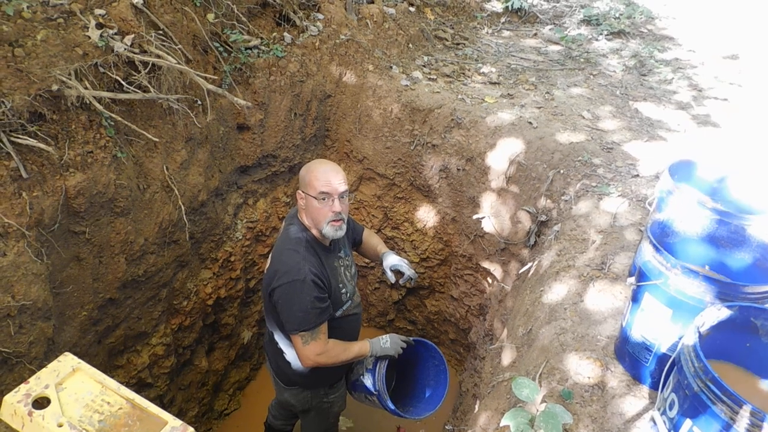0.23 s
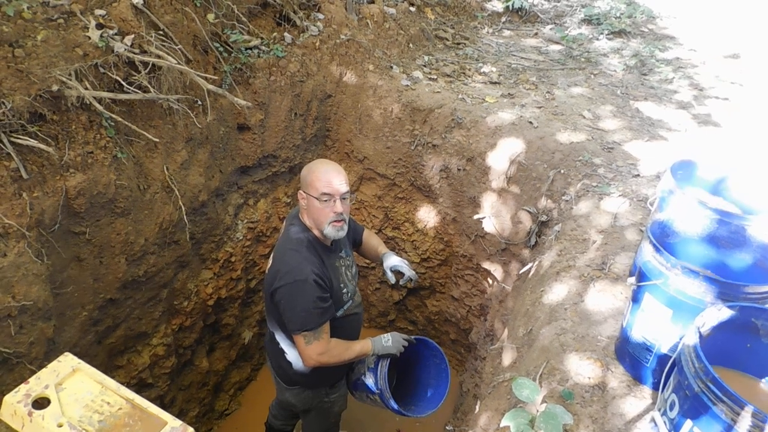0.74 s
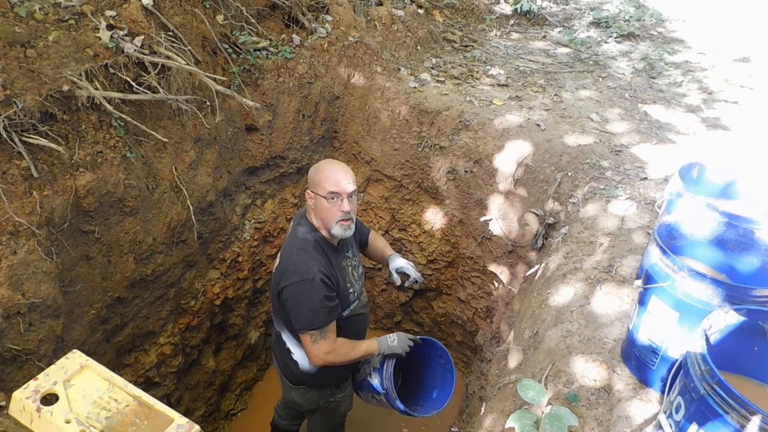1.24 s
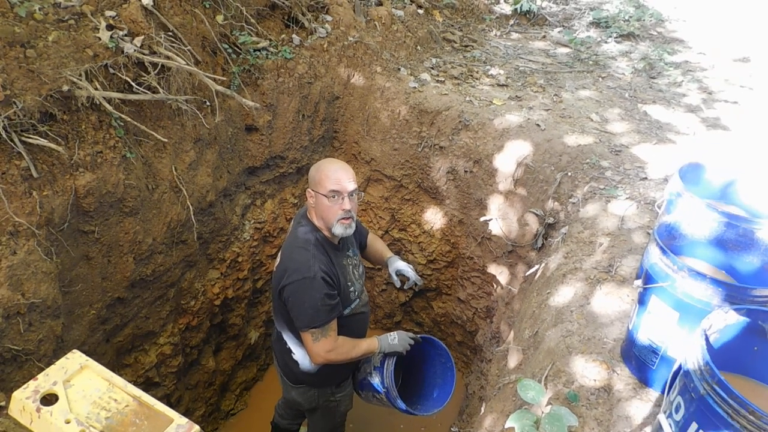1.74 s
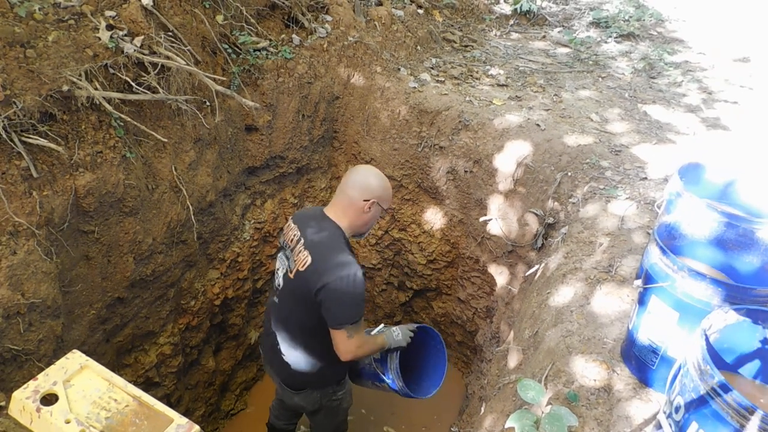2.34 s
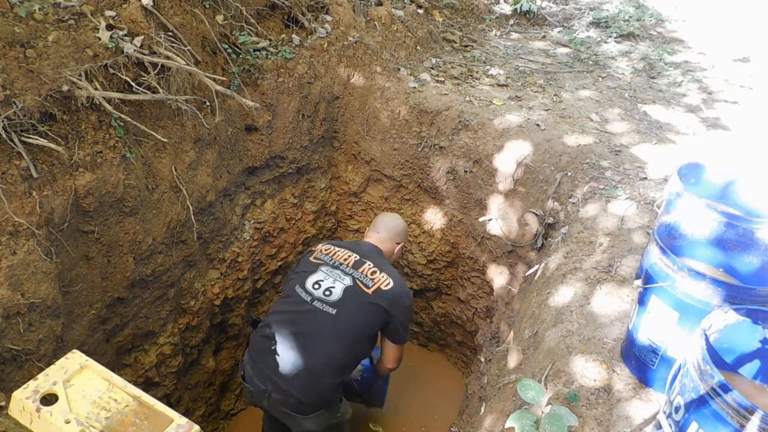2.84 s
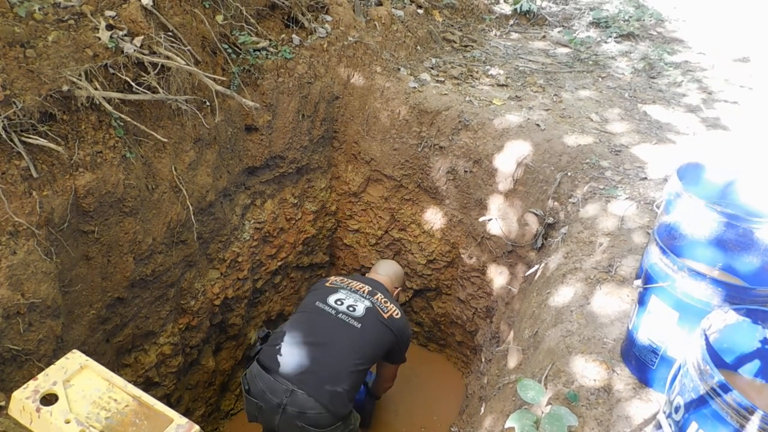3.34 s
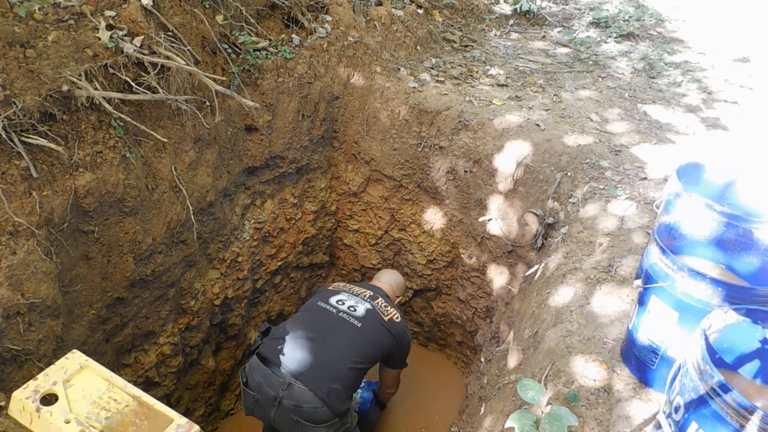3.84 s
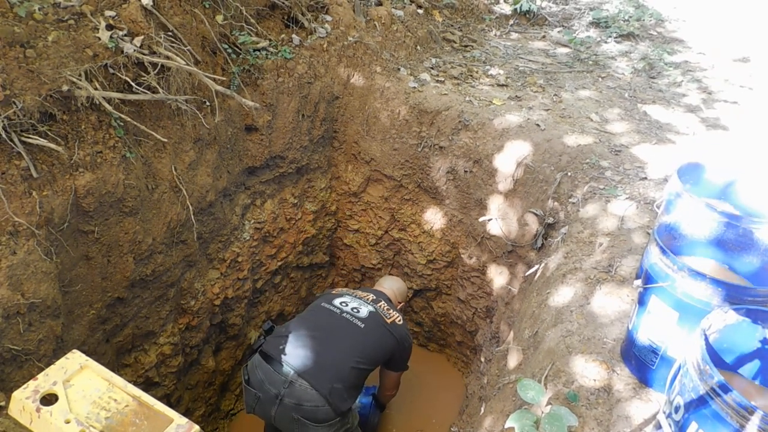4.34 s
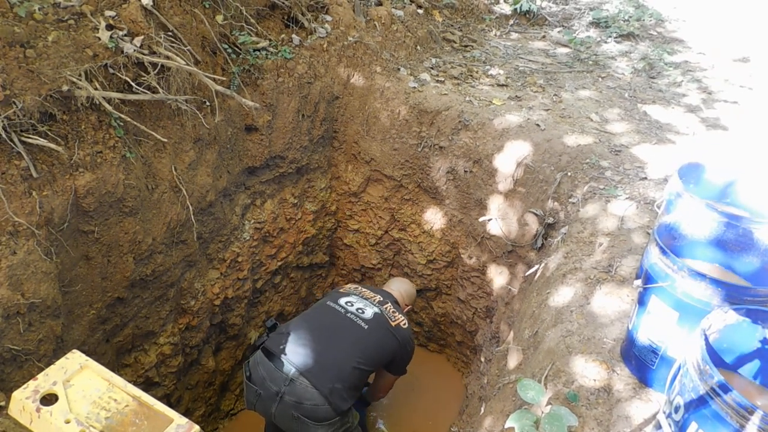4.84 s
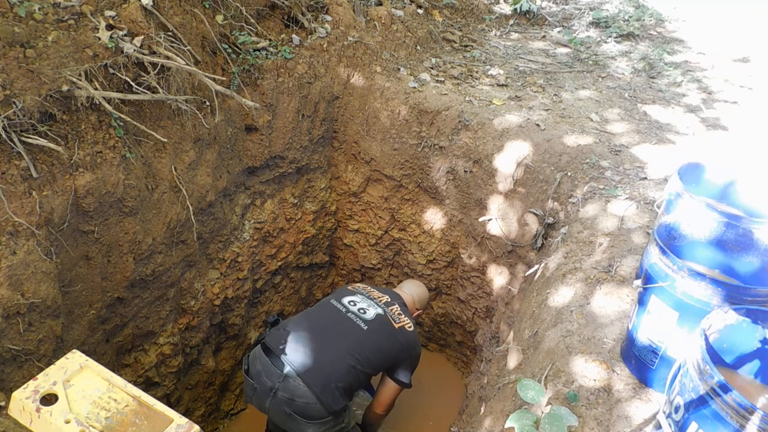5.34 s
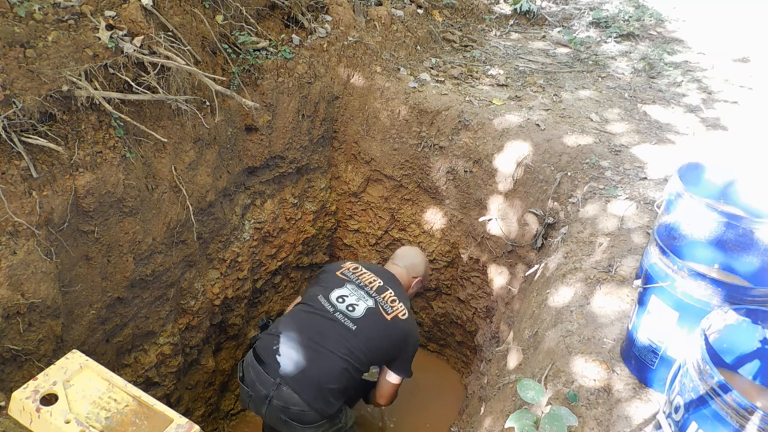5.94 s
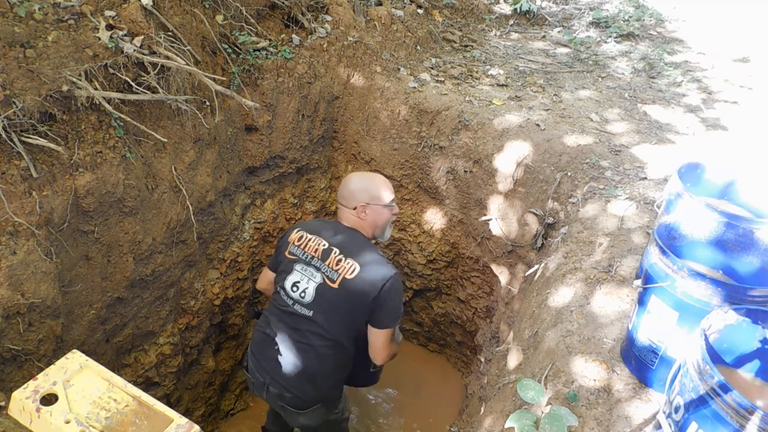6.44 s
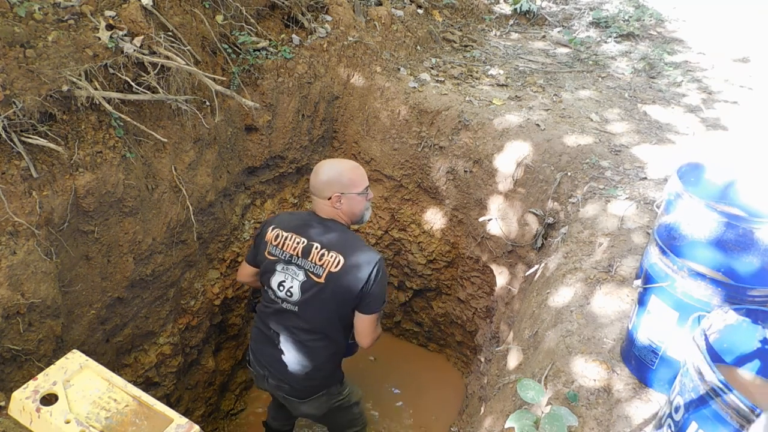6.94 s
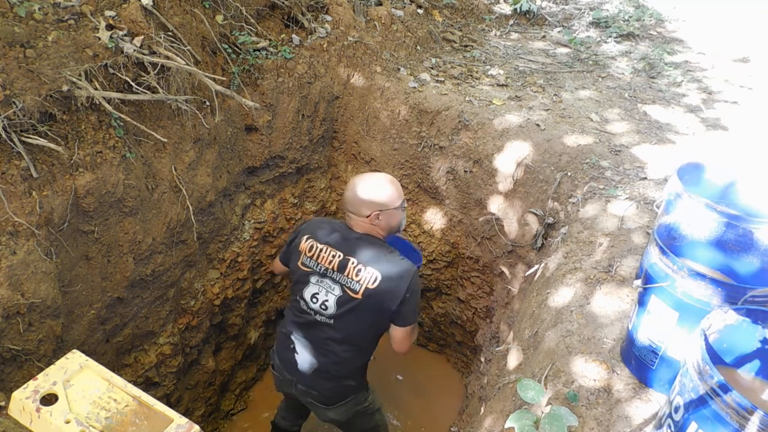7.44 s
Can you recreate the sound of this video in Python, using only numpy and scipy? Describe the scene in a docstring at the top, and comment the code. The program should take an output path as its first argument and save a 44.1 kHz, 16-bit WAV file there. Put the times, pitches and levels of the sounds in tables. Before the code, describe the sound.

Insects shrill softly outdoors; light knocks and boot shuffles, then a plastic bucket slaps muddy water, gulps, sloshes, and lifts out dripping.

```python
"""At the bottom of an earth pit in summer woodland, a plastic bucket is dipped into muddy water.
After light knocks close by and some shuffling, it slaps the surface, gulps, is hauled out in a rush
of water, then drips and bumps as it is lifted. Insects shrill in the trees throughout.
Water is built from rising bubbles and grainy noise, the bucket and knocks from ringing modes,
boots and insects from shaped noise; echoes from the clay walls surround what happens in the pit."""
import sys
import numpy as np
from scipy import signal
from scipy.fft import rfft, irfft, next_fast_len
from scipy.io import wavfile
from scipy.ndimage import uniform_filter1d

SR = 44100
rng = np.random.default_rng(int(sys.argv[2]) if len(sys.argv) > 2 else 0)


def put_to_file(sound):
    """Save the sound as 16-bit audio at rate SR, in the file named by the first command-line argument."""
    columns = np.atleast_2d(sound).T  # one column per channel
    safe = np.clip(columns, -1, 1)
    whole_steps = np.round(safe * 32767)
    wavfile.write(sys.argv[1], SR, whole_steps.astype(np.int16))


N = 339570
T = np.arange(N) / SR


def from_db(db):
    """Turn decibels into a gain."""
    return 10 ** (np.asarray(db) / 20)


def rms_one(x):
    """Scale a sound to an average (rms) level of 1."""
    return x / np.sqrt(np.mean(x ** 2) + 1e-20)


def at_hz(points, hz):
    """Read a table between its points, along a logarithmic pitch axis."""
    point_hz, value = np.transpose(points)
    return np.interp(np.log(np.maximum(hz, 1)), np.log(point_hz), value)


def band(x, low_hz, high_hz):
    """Keep only the sound between two pitches."""
    edges_hz = [low_hz, min(high_hz, SR / 2 - 1000)]
    return signal.sosfilt(signal.butter(2, edges_hz, "band", fs=SR, output="sos"), x + 1e-18)


# How alike left and right are, for near sounds and for far ones: [pitch_hz, likeness_0_to_1]
NEAR_LIKENESS = [(60, 0.8), (300, 1), (700, 0.95), (1400, 0.82), (3000, 0.53), (6800, 0.1), (15000, 0)]
FAR_LIKENESS = [(60, 0.77), (300, 0.23), (1400, 0.32), (3000, 0), (7000, 0.11), (15000, 0)]


def noise(colour, likeness, size=N):
    """Stereo noise with a given spectrum and left-right likeness, at rms 1."""
    n = next_fast_len(size)
    hz = np.arange(n // 2 + 1) * SR / n
    mid, side = rfft(rng.standard_normal((2, n)))
    alike = np.clip(at_hz(likeness, hz), -1, 1)
    pair = np.sqrt(1 + alike) * mid + np.sqrt(1 - alike) * side * [[1], [-1]]
    return rms_one(irfft(pair * from_db(at_hz(colour, hz)), n)[:, :size])


def flutter(per_s):
    """A smooth random wander with rms 1, given a new target per_s times a second."""
    knots = rng.standard_normal(4000)
    return rms_one(np.interp(T * per_s, np.arange(len(knots)), knots))


def add(out, s, sound):
    """Mix a sound in at time s."""
    i = max(int(s * SR), 0)
    room = out[..., i:i + sound.shape[-1]]
    room += sound[..., :room.shape[-1]]


def bursts(rows):
    """Sum sudden, dying envelopes from rows of (start_s, level_db, decay_s)."""
    out = np.zeros(N)
    for s, db, decay in rows:
        add(out, s, from_db(db) * np.exp(-T[:SR // 5] / max(decay, .0005)))
    return out


def swells(rows, swell_share, end_s):
    """Envelopes that swell, hold and die away, from rows of (start_s, length_s, level_db)."""
    power, t = np.zeros(N), T[:SR]
    for s, length, db in rows:
        attack = np.minimum(t / (swell_share * length), 1)
        release = np.exp(-np.maximum(t - length, 0) / end_s)
        add(power, s, (from_db(db) * attack * release) ** 2)
    return np.sqrt(power)


def patter(per_s, spread_db, decay_s, mist):
    """Level of spray: many droplets, each a sudden tick, over an even mist."""
    size_db = abs(spread_db) * np.minimum(rng.exponential(1, N), 3)
    hits = (rng.random(N) < per_s / SR) * from_db(size_db)
    ticks = signal.lfilter([1], [1, -np.exp(-1 / (decay_s * SR))], hits + 1e-18)
    return rms_one(mist + rms_one(ticks))


def ring(force, hz, t60):
    """A ringing mode: a single click starts a sine that fades by 60 dB in t60 seconds."""
    r, w = from_db(-60 / (t60 * SR)), 2 * np.pi * hz / SR
    return signal.lfilter([0, np.sin(w)], [1, -2 * r * np.cos(w), r * r], force + 1e-18)


def shaken(modes, push):
    """Modes shaken by a gritty contact, as strongly as it pushes."""
    force = noise([(100, 0), (15000, 0)], NEAR_LIKENESS) * push
    body = sum((-1) ** k * from_db(db) * ring(force, hz, t60) for k, (hz, db, t60) in enumerate(modes))
    return rms_one(body) * np.std(force)


def bubble(hz, t60, rise, lag=0, onset_cycles=1.0):
    """A trapped air pocket rings with a moving pitch (rise, octaves per s); lag in s delays one ear."""
    t = np.arange(int(t60 * SR) + 20) / SR
    t = np.maximum(t + np.array([[lag], [-lag]]) / 2, 0)
    swell = 1 - np.exp(-t * hz / onset_cycles)
    fade = np.exp(-np.log(1000) * t / t60)
    return swell * fade * np.sin(2 * np.pi * hz * t * (1 + np.log(2) * rise * t / 2))


# Spectrum of the open air: [pitch_hz, level_db per Hz]
AIR_COLOUR = [(20, -30), (60, -28.5), (120, -27), (250, -22.5), (500, -15), (800, -13.5), (1250, -14),
              (2000, -15), (2800, -18), (4000, -21.5), (5600, -26), (9000, -29.5), (15500, -34.5)]
# Far insect choruses and a faint high whine: [pitch_hz, width_hz, level_db]
INSECTS = [(1459, 12, -76), (1492, 60, -68.5), (1688, 22, -72.5), (2750, 200, -76.5), (7118, 81, -69.5),
           (7317, 270, -68), (6920, 550, -70.5), (13690, 41, -87)]


def woodland(air_db=-61.5, waver_db=1.25):
    """Soft open-air hush, and distant insects blended into narrow, wavering bands of noise."""
    out = from_db(air_db) * noise(AIR_COLOUR, FAR_LIKENESS)
    for hz, width, db in INSECTS:
        t60 = np.log(1000) / (np.pi * width)  # a narrow band rings longer
        chorus = ring(noise([(100, 0), (15000, 0)], FAR_LIKENESS), hz, t60)
        chorus = rms_one(band(chorus, hz - 2 * width, hz + 2 * width))
        out += from_db(db + waver_db * flutter(17)) * chorus
    return out


# Boots and clothes shifting as the weight moves: [start_s, length_s, level_db]
SHIFTS = [(0.595, 0.027, -79), (1.91, 0.1, -63), (2.115, 0.022, -59), (2.63, 0.15, -64), (2.85, 0.16, -61)]
SHIFT_SWELL_SHARE, SHIFT_END_S, RUSTLE_DB = 0.093, 0.07, -5


def shuffle():
    """Boots scuff in the wet clay (low noise) and cloth rubs (high noise), in uneven grains."""
    grain = rms_one(from_db(2.3 * flutter(220)))
    scuff = noise([(80, -14), (300, -22), (900, 8.5), (1700, 14.0), (3000, -1.5), (6000, -21)], NEAR_LIKENESS)
    rustle = noise([(1500, -37), (3200, 3.0), (6000, -2), (15000, -12)], NEAR_LIKENESS)
    level = swells(SHIFTS, SHIFT_SWELL_SHARE, SHIFT_END_S)
    return grain * level * (scuff + from_db(RUSTLE_DB) * rustle)


# Boots set down in the wet clay: [start_s, level_db, thud_db against the level]
STEPS = [(1.986, -51.5, -33), (2.048, -54, -16), (2.145, -42, -21), (2.645, -58, -6), (2.671, -54, -26),
         (2.891, -52.5, -6.5), (2.985, -49.5, -24)]
STEP_S, STEP_THUD_S = 0.0075, 0.016  # decay of the pat and of the thud


def steps():
    """A boot lands with a short, dead pat of noise and a soft, lower thud."""
    pat = noise([(200, -40), (500, -6.5), (900, 4), (1400, 1), (2500, -12), (6000, -19), (15000, -37)],
                NEAR_LIKENESS)
    thud = noise([(50, -28), (110, -10), (220, -20), (340, 0), (600, -1), (1500, -40), (15000, -60)],
                 NEAR_LIKENESS)
    pats = pat * bursts([(s, db, STEP_S) for s, db, _ in STEPS])
    thuds = thud * bursts([(s, db + thud_db, STEP_THUD_S) for s, db, thud_db in STEPS])
    return pats + thuds


# Spectrum of the microphone's rumble: [pitch_hz, level_db per Hz]
RUMBLE_COLOUR = [(10, -2), (35, -1), (60, -7), (110, -3), (160, -11), (400, -22), (1500, -48), (15000, -80)]
SHAKE_DB, SHAKE_S = -43, 0.051  # rumble against the knock, and its decay


def rumble():
    """Each close knock also shakes the microphone: a short swell of low noise."""
    shakes = [(s, .005, db + SHAKE_DB) for s, db, _, _ in TAPS]
    return swells(shakes, 0.91, SHAKE_S) * noise(RUMBLE_COLOUR, FAR_LIKENESS)


# Light knocks on something hard close by; the spot struck favours one pitch:
# [start_s, level_db, click_db against the level, favoured_pitch_hz]
TAPS = [(0.580, -55, 1.5, 2000), (0.621, -37, -30, 1350), (0.649, -28, -22, 1510),
        (0.651, -31.5, -37, 1310), (0.763, -42, -0.5, 1950), (0.7713, -25.5, -31, 1310),
        (0.821, -28, -31, 900), (0.829, -34, -18, 1700), (0.8363, -19.5, -29, 1100),
        (0.841, -30, -34, 1200), (0.844, -29, -28, 1650), (0.854, -24.5, -20, 1600), (0.86, -29, -36, 1500),
        (0.872, -33, -25, 1550), (0.878, -32, -21, 750), (0.898, -35.5, -21, 1500),
        (0.9289, -28, -26, 1640), (0.9318, -25, -38, 1300)]
# What the knocks ring with: [pitch_hz, level_db, t60_s]
TAP_MODES = [(103, -15, 0.086), (286, -13.5, 0.23), (703, -18.5, 0.14), (1040, -7.5, 0.026),
             (1290, -8.5, 0.03), (1617, -5, 0.021), (2000, -13, 0.018), (2860, -11, 0.016),
             (4560, 1, 0.014), (5470, -14, 0.013)]
TAP_FOCUS_DB = 8  # fall of the modes per octave away from the favoured pitch


def taps(click_s=0.0049, rattle_db=-22, rattle_s=.014, lag_s=.00008):
    """Hard, short knocks just to the right: ringing modes, a click on top and a brief rattle."""
    out = np.zeros((2, N))
    strengths_db = rng.normal(0, 0.96, (len(TAPS), len(TAP_MODES)))
    for (s, db, _, favoured_hz), strength_db in zip(TAPS, strengths_db):
        for k, (hz, mode_db, t60) in enumerate(TAP_MODES):
            focus_db = -TAP_FOCUS_DB * abs(np.log2(hz / favoured_hz))
            gain = (-1) ** k * from_db(db + mode_db + focus_db + strength_db[k] - 5.0)
            add(out, s, gain * bubble(hz, t60, 0, -lag_s, onset_cycles=0.81))  # rise 0: a steady pitch
    click = noise([(300, -18), (2000, 13.5), (3700, -6), (4800, 5.0), (6300, 0.5), (15000, -10)],
                  NEAR_LIKENESS)
    rattle = noise([(30, -22), (300, 2.0), (1100, 1.0), (1800, 4), (3200, -14.5), (15000, -45)],
                   FAR_LIKENESS)
    rattle *= patter(per_s=370, spread_db=9, decay_s=0.0027, mist=0.71)
    out += click * bursts([(s, db + click_db, click_s) for s, db, click_db, _ in TAPS])
    out += rattle * bursts([(s, db + rattle_db, rattle_s) for s, db, _, _ in TAPS])
    return out * from_db([[-1], [1]])


# Flung drops landing on mud and plastic: [start_s, level_db, decay_s]
SPATTERS = [(2.147, -50, .0058), (3.729, -62, .012), (3.958, -47.5, 0.005), (4.274, -47.5, 0.0045),
            (4.345, -47, 0.0037), (4.727, -52, 0.011), (5.557, -59, 0.0039), (5.887, -44, 0.0036),
            (5.962, -43, 0.0029), (6.018, -45, 0.0024), (6.087, -41, .003), (6.175, -42.5, .006),
            (6.196, -48, .004), (6.23, -39, 0.0021), (6.249, -45, 0.0022), (6.382, -53.5, .005),
            (6.405, -50, .003), (6.628, -50.5, 0.0059), (6.772, -53, .005), (6.858, -55, 0.0035),
            (6.882, -56, 0.0035), (7.131, -59, .004), (7.146, -60, 0.0045), (7.335, -48, .005),
            (7.353, -54, 0.0039), (7.394, -51, 0.0046), (7.412, -63, 0.0032), (7.441, -59, .005)]


def spatter():
    """Drops burst in short, bright ticks of noise, a little to the right."""
    tick = noise([(500, -27), (2000, 17.0), (5000, 17.5), (10000, 10.5), (15000, 10)], FAR_LIKENESS)
    return tick * bursts(SPATTERS) * from_db([[-1.5], [1.5]])


# Bumps and slops against the bucket: [start_s, level_db, contact_length_s, thud_db against the level]
BUMPS = [(3.198, -37.5, 0.024, -4), (3.306, -37.5, 0.0033, -2), (3.42, -62, 0.0062, 2),
         (3.552, -51, 0.0067, -3), (3.659, -45.5, 0.014, -5), (3.728, -41, 0.0087, -27),
         (3.854, -46.5, 0.0037, -9), (4.129, -47, 0.022, -4.5), (4.564, -46, 0.01, -11),
         (4.723, -40.5, 0.0051, -7), (5.061, -51, 0.01, -27), (5.394, -51, 0.0062, 2),
         (5.5535, -42, 0.0044, -22), (5.626, -49.5, 0.0076, -22), (6.06, -49, 0.016, 3),
         (6.704, -43.5, 0.0059, -26), (6.716, -36.5, 0.01, -18), (6.738, -37, 0.0042, -19),
         (6.742, -36, 0.0026, -24), (6.881, -46, 0.01, -22), (6.915, -54, 0.0026, -26),
         (6.953, -41.5, 0.0027, -28), (6.992, -41, 0.0074, -24), (7.068, -44.5, 0.012, -26),
         (7.33, -42, 0.0039, -20), (7.44, -41, 0.014, -28)]
# Ringing of the wet bucket: [pitch_hz, level_db, t60_s]
BUCKET_MODES = [(392, -16.5, 0.2), (603, -3, 0.013), (822, -5, 0.077), (1044, -2, 0.019),
                (1170, 0.5, 0.034), (1274, -1, 0.055), (1423, 0, 0.029), (1667, 0.5, 0.029),
                (1890, -4.5, 0.025), (2560, 1, 0.0067), (3300, -15.5, 0.033)]
# Heavy thud of the water and the bucket's base: [pitch_hz, level_db, t60_s]
THUD_MODES = [(98, -17, 0.56), (121, -22, 0.2), (181, -15, 0.13), (275, -0.5, 0.12), (410, -16, 0.066)]


def bucket(crack_db=-11):
    """Each bump cracks briefly, shakes the thin wall, which radiates no bass, and adds its own thud."""
    push = bursts([(s, db, length) for s, db, length, _ in BUMPS])
    shove = bursts([(s, db + thud_db, length) for s, db, length, thud_db in BUMPS])
    crack = push * noise([(100, -32), (400, -19.0), (1200, 22.0), (3000, 7), (6000, 3.0), (15000, -21)],
                         NEAR_LIKENESS)
    wall = band(shaken(BUCKET_MODES, push), 480, 5800)
    thud = from_db(-18.0) * shaken(THUD_MODES, shove)
    return wall + thud + from_db(crack_db) * crack


# The rim touches the surface, then the wall smacks down: [start_s, length_s, level_db]
SMACKS = [(3.184, 0.019, -41), (3.197, 0.0067, -30.5)]
# Spectrum of the smack: [pitch_hz, level_db per Hz]
SLAP_COLOUR = [(88, -66), (150, -61), (656, -17), (796, -1.5), (1240, -9), (1370, -11), (1510, -6),
               (1660, -12), (2020, 3), (2700, -9.5), (6470, -10.5), (8010, -18), (9540, -14.5),
               (15500, -25)]
SMACK_SWELL_SHARE, SMACK_END_S = 0.97, 0.0098


def slap():
    """The bucket meets the water over some milliseconds, in swelling bursts of bright noise."""
    return swells(SMACKS, SMACK_SWELL_SHARE, SMACK_END_S) * noise(SLAP_COLOUR, NEAR_LIKENESS)


# Air gaps at the bucket's mouth gurgle, gliding as they open or fill:
# [start_s, length_s, start_pitch_hz, end_pitch_hz, level_db]
GURGLES = [(3.309, 0.069, 521, 493, -60), (3.728, 0.037, 2850, 3300, -60.5),
           (4.427, 0.098, 693, 501, -52.5), (4.62, 0.11, 627, 491, -61), (5.599, 0.062, 731, 475, -56.5),
           (5.685, 0.0607, 352, 510, -53.5), (5.887, 0.093, 305, 282, -70.5), (7.244, 0.073, 438, 395, -62)]
GURGLE_WIDTH_SHARE = 0.056  # smoothing cutoff as a share of the start pitch
GURGLE_SWELL_SHARE, GURGLE_END_S = 0.22, 0.013


def gurgles():
    """Churning water blows on a pocket of air: a narrow band of noise whose pitch slides."""
    out, t = np.zeros(N), T[:SR // 4]
    for s, length, start_hz, end_hz, db in GURGLES:
        hz = start_hz * (end_hz / start_hz) ** np.minimum(t / length, 1)
        phase = 2 * np.pi * np.cumsum(hz) / SR
        smooth = signal.butter(2, GURGLE_WIDTH_SHARE * start_hz, fs=SR, output="sos")
        a, b = signal.sosfilt(smooth, rng.standard_normal((2, SR)))[:, -len(t):]
        envelope = swells([(0, length, db)], GURGLE_SWELL_SHARE, GURGLE_END_S)[:len(t)]
        add(out, s, envelope * rms_one(a * np.cos(phase) + b * np.sin(phase)))
    return out


# Air pockets and falling drops slapping shut in a short, dead plop: [start_s, pitch_hz, level_db]
PLOPS = [(2.891, 316, -39), (3.419, 2070, -32.5), (3.555, 970, -38), (3.662, 286, -33),
         (3.889, 3600, -47.5), (4.139, 1530, -34), (4.150, 960, -26), (4.724, 303, -27.5),
         (5.410, 395, -32.5), (5.549, 1180, -32.5), (5.641, 3120, -32), (5.761, 2970, -34),
         (5.776, 910, -28.5), (6.178, 3300, -38.5), (6.193, 1830, -35), (6.771, 3370, -49),
         (6.854, 3120, -42.5), (6.92, 1120, -37), (7, 1360, -36), (7.066, 1640, -33), (7.070, 1460, -43),
         (7.335, 1380, -39), (7.694, 2750, -43)]
PLOP_T60_S, PLOP_RISE_OCTAVES_PER_S = 0.017, 14


def plops():
    """A squeezed air pocket rings like a bubble, but dies quickly."""
    out = np.zeros((2, N))
    for s, hz, db in PLOPS:
        add(out, s, from_db(db) * bubble(hz, PLOP_T60_S, PLOP_RISE_OCTAVES_PER_S, onset_cycles=1.4))
    return out


# Large single bubbles: [start_s, pitch_hz, level_db, rise_octaves_per_s]
GLUGS = [(3.225, 1410, -45, -2), (3.234, 947, -34.5, -4), (3.268, 1190, -41, 4), (3.336, 847, -43, 1),
         (3.349, 1940, -41, -5.5), (3.426, 2470, -42.5, 6), (3.426, 970, -43, -2), (3.478, 944, -40.5, 4.5),
         (3.50, 723, -41, 12), (3.532, 3230, -49, 7), (3.555, 883, -39.5, 2), (3.567, 980, -38, 5.5),
         (3.594, 3730, -49, 8), (3.729, 3030, -46, 10), (3.777, 1890, -41.5, 6), (3.949, 1260, -41, 4),
         (4.032, 1470, -40, 3), (4.08, 1485, -32.5, 12), (4.082, 1160, -39, -1.5),
         (4.086, 983, -36.5, -4.5), (4.119, 406, -44, 12), (4.143, 926, -35, 0.5), (4.146, 1150, -40, 1),
         (4.15, 171, -64.5, -0.5), (4.214, 172, -62.5, 1.5), (4.171, 1190, -31, -7), (4.175, 294, -44, 1),
         (4.203, 890, -35, 4), (4.24, 730, -41.5, -2), (4.341, 1040, -44, 6), (4.411, 1156, -36, -0.5),
         (4.417, 940, -32, -1), (4.472, 940, -41, 0), (4.575, 2144, -37.5, -1), (4.60, 963, -35, -1),
         (4.608, 603, -38.5, 4.5), (4.753, 1960, -42, 7), (4.836, 1800, -49, 7), (5.06, 1130, -46, 6),
         (5.562, 1720, -42, -7), (5.566, 1880, -35.5, -3), (5.604, 762, -35, -5), (5.605, 1080, -38, 2),
         (5.607, 2700, -36.5, -3), (5.608, 3050, -34.5, 1), (5.654, 783, -37.5, 2.5),
         (5.66, 1966, -37.5, 1.5), (5.729, 2560, -34, 1.5), (5.752, 3670, -36.5, 3),
         (5.754, 2925, -34, 3.5), (5.777, 1660, -37, 4), (5.777, 870, -33.5, -7), (5.856, 2130, -45, -2),
         (5.966, 1484, -37, 2.5), (5.973, 2582, -39, 2), (6.051, 1486, -37, 3), (6.091, 1810, -34.5, -3.5),
         (6.125, 2400, -34.5, 9), (6.142, 1473, -38, 3), (6.206, 953, -42.5, 13.5),
         (6.258, 2010, -37.5, 10), (6.335, 544, -47.5, 7.5), (6.412, 874, -37.5, 20),
         (6.676, 784, -40.5, -0.5), (6.716, 769, -37, 5), (6.817, 2064, -45, 3), (7.002, 383, -49, 1.5),
         (7.006, 836, -40.5, -2.5), (7.061, 1570, -36.5, 0), (7.144, 2580, -40, -6),
         (7.168, 1062, -41.5, 8), (7.182, 907, -42.5, 1.5), (7.291, 1990, -48, -1), (7.335, 1345, -43, -8),
         (7.392, 1354, -43, 13), (7.405, 2320, -45, 3), (7.546, 383, -54.5, 5), (7.557, 1840, -42.5, -1),
         (7.6, 1900, -47, 2.5), (7.598, 3510, -40, -2)]
# t60 of a 1 kHz bubble, and the power of pitch by which higher bubbles die sooner
GLUG_T60_S, GLUG_SHORTENS = 0.066, 0.73
# the pit's walls throw each glug back after random delays
WALL_ECHO_DB, WALL_NEAR_S, WALL_FAR_S = -8, .004, .013


def glugs(sister_db=-11, scatter_octaves=0.306, scatter_s=0.027, fizz_db=-17, fizz_s=0.0031):
    """Each large bubble breaks off in a puff of fizz with three softer sisters and three wall echoes."""
    fizz = bursts([(s, db + fizz_db, fizz_s) for s, _, db, _ in GLUGS])
    out = noise(WATER_COLOUR, NEAR_LIKENESS) * fizz
    for (s, hz, db, rise), draws in zip(GLUGS, rng.random((len(GLUGS), 3, 4))):
        t60 = GLUG_T60_S / (hz / 1000) ** GLUG_SHORTENS
        glug = from_db(db) * bubble(hz, t60, rise, onset_cycles=3.0)
        add(out, s, glug)
        for when, pitch, place, wall in draws:
            sister_hz = hz * 2 ** (scatter_octaves * (2 * pitch - .5))  # mostly higher
            sister = bubble(sister_hz, t60 / 2, rise, 0.000098 * (place - .5))
            add(out, s + scatter_s * when, from_db(db + sister_db) * sister)
            delay_s = WALL_NEAR_S + (WALL_FAR_S - WALL_NEAR_S) * wall
            left_right = np.sqrt([[place], [1 - place]])
            add(out, s + delay_s, from_db(WALL_ECHO_DB) * glug * left_right)
    return out


# Spectrum of stirred water: [pitch_hz, level_db per Hz]
WATER_COLOUR = [(59, -63), (100, -88), (253, -28), (293, -41), (347, -18.5), (386, -21), (487, -9.5),
                (956, -1), (1340, 0.5), (1550, 0.5), (2690, 0.5), (4860, -6.5), (7410, -17.5),
                (15500, -26.5)]


def bubble_cloud(low_hz, high_hz, count, cycles, wash, spread_db, climb=0.075, lag_s=0.00011):
    """Bubbles of random size and place over a grainy wash of turbulence, evened to a steady level."""
    out = np.zeros((2, N))
    start = SLOSHES[0][0] - .05  # just before the first slosh
    for when, pitch, size, life, place in rng.random((count, 5)):
        hz = low_hz * (high_hz / low_hz) ** pitch
        t60 = cycles / hz * 2 ** (2 * life - 1)
        level_db = at_hz(WATER_COLOUR, hz) + spread_db * size ** 2
        sound = from_db(level_db) * bubble(hz, t60, climb / t60, lag_s * (2 * place - 1))
        add(out, start + when * (T[-1] - start), sound)
    grains = patter(per_s=450, spread_db=7, decay_s=0.002, mist=0.6)
    turbulence = band(noise(WATER_COLOUR, NEAR_LIKENESS) * grains, low_hz, high_hz)
    out = rms_one(out) + wash * rms_one(turbulence)
    power = uniform_filter1d(np.mean(out ** 2, axis=0), size=1300)
    power = uniform_filter1d(power, size=1300)
    return out / np.sqrt(np.maximum(power, 1e-6))


# A slosh swells for a share of its length, holds, settles quickly and leaves faint ripples
SWELL_SHARE, SETTLE_S, RIPPLE_DB, RIPPLE_S = 0.31, 0.033, -11, 0.21


def churn(rows):
    """Level of stirred water: the sloshes themselves and the ripples that they leave."""
    sloshes = swells(rows, SWELL_SHARE, SETTLE_S)
    ripples = from_db(RIPPLE_DB) * swells(rows, SWELL_SHARE, RIPPLE_S)
    return np.hypot(sloshes, ripples)


# Each shove of the bucket or a leg throws up one slosh: [start_s, length_s, level_db,
# depth_db: gulps against the level, splash_db: droplets against the level]
SLOSHES = [(3.214, 0.025, -47.5, -10.5, -10), (3.276, 0.088, -51.5, -7, -10),
           (3.414, 0.011, -57.5, 0.5, -7), (3.474, 0.041, -62.5, 6.5, -5), (3.535, 0.074, -53.5, -9, -7.5),
           (3.633, 0.041, -56, 1.5, -1), (3.704, 0.063, -51.5, -6, -11.5), (3.909, 0.05, -55, -10, -1.5),
           (3.96, 0.11, -53.5, -13, 0.5), (4.076, 0.17, -47, -7, -8.5), (4.23, 0.17, -51.5, -8.5, -7.5),
           (4.408, 0.04, -52.5, -7, -0.5), (4.446, 0.11, -50.5, -22, -4.5), (4.558, 0.04, -48, -3.5, -23),
           (4.617, 0.12, -53.5, -4, -6), (4.777, 0.081, -59, -20, -2), (4.901, 0.13, -60.5, -16, -4.5),
           (5.023, 0.035, -57.5, -27, -5.5), (5.383, 0.037, -61, -2, -1.5), (5.437, 0.054, -64, -20, 0.5),
           (5.529, 0.056, -55.5, -30, 2), (5.579, 0.075, -50.5, -13, -1.5), (5.67, 0.061, -50, -9, -5),
           (5.717, 0.093, -50, -28, 0.5), (5.816, 0.08, -48.5, -16, -0.5), (5.897, 0.1, -48.5, -9.5, -2.5),
           (5.996, 0.11, -48, -9.5, 0.5), (6.133, 0.019, -51, -8.5, -2.5), (6.176, 0.014, -53.5, -22, -0.5),
           (6.248, 0.02, -54, -25, 0), (6.3, 0.39, -62.5, -7.5, -2), (6.714, .035, -59, -19, 2),
           (6.754, 0.23, -64, -10, 1), (6.995, 0.011, -54, -7, -10), (7.125, 0.029, -57, -19, 0),
           (7.169, 0.02, -64.5, -22, 7), (7.23, 0.046, -51.5, -23, -8), (7.323, 0.03, -58, -17, 1),
           (7.378, 0.038, -58, -8, 1.5), (7.426, 0.037, -54, -6.5, -10), (7.505, 0.062, -59, -29, -1.5),
           (7.581, 0.012, -75, -41, 17.5)]
# Water streaming off the lifted bucket in a hissing sheet: [start_s, length_s, level_db]
STREAMS = [(5.93, 0.13, -49.5), (7.32, 0.037, -63)]
STREAM_SWELL_SHARE, STREAM_END_S = 0.62, 0.065
GULPS_DB, BUBBLES_DB = -1, -1.5
SPRAY_DB = -5  # fine spray against the droplets


def water():
    """Big pockets gulp, smaller ones babble, drops tinkle, and torn sheets of water hiss in spurts."""
    gulps = churn([(s, length, db + depth_db) for s, length, db, depth_db, _ in SLOSHES])
    bubbles = churn([(s, length, db) for s, length, db, _, _ in SLOSHES])
    droplets = churn([(s, length, db + splash_db) for s, length, db, _, splash_db in SLOSHES])
    streams = swells(STREAMS, STREAM_SWELL_SHARE, STREAM_END_S)
    spray = np.hypot(from_db(SPRAY_DB) * droplets, streams)
    big = bubble_cloud(203, 652.0, count=600, cycles=27, wash=1.0, spread_db=6.0)
    small = bubble_cloud(617.5, 2233, count=2600, cycles=26.6, wash=1.0, spread_db=9.5)
    tinkle = bubble_cloud(2122, 6090, count=2400, cycles=38, wash=0.9, spread_db=13)
    hiss = rms_one(band(noise(WATER_COLOUR, NEAR_LIKENESS), 6400, 15400))
    hiss = hiss * patter(per_s=300, spread_db=5.5, decay_s=0.0045, mist=0.3)
    out = from_db(GULPS_DB) * gulps * big + from_db(BUBBLES_DB) * bubbles * small
    out += droplets * tinkle * from_db([[-.9], [.9]])
    return out + spray * hiss * from_db([[-1.6], [1.6]])


# Ringing of the air in the half-sunk bucket: [pitch_hz, width_hz, level_db against the water]
HOLLOW_MODES = [(560, 27, -20), (970, 57, 3.5), (1210, 55, 2), (1470, 33, -12), (2080, 68, -13.5)]
# How much of the water rings that hollow as the bucket rises: [time_s, share_0_to_1]
SUNK = [(4.9, 0.5), (5.5, 0.12)]


def hollow(x):
    """The bucket's air space adds resonances to the sloshing, more weakly as the bucket rises."""
    sunk = np.clip(np.interp(T, *np.transpose(SUNK)), 0, 1)
    out = x
    for hz, width, db in HOLLOW_MODES:
        b, a = signal.iirpeak(hz, hz / width, fs=SR)
        out = out + from_db(db) * signal.lfilter(b, a, x * sunk + 1e-18)
    return out


def pit(x, t60=0.16, wet_db=-9, gap_s=0.0033):
    """Close clay walls return a short scatter of echoes: fading noise after a small gap."""
    t = T[:SR // 4]
    echoes = noise([(100, 0.0), (400, 0.0), (2000, 11.5), (6000, 8.0), (15000, -1.5)],
                   FAR_LIKENESS, size=len(t))
    echoes = echoes * np.exp(-np.log(1000) * t / t60) * np.clip(t / gap_s - 1, 0, 1)
    echoes = echoes / np.sqrt(np.sum(echoes ** 2))
    return x + from_db(wet_db) * signal.fftconvolve(x.mean(axis=0)[None], echoes, axes=1)[:, :N]


def scene():
    """Water, bucket and boots sound from down in the pit; knocks are close, the woodland all round."""
    body = shuffle() + steps()
    splashes = spatter() + slap() + bucket()
    pockets = gurgles() + plops() + glugs()
    below = body + splashes + pockets + hollow(water())
    dry = woodland() + rumble() + taps() + pit(below)
    return dry * from_db([[-.25], [.25]])


def record(dry):
    """Cut the top steeply above 15.8 kHz."""
    return signal.sosfilt(signal.ellip(10, .1, 70, 15800, fs=SR, output="sos"), dry)


dry = scene()
out = record(dry)
put_to_file(out)
```